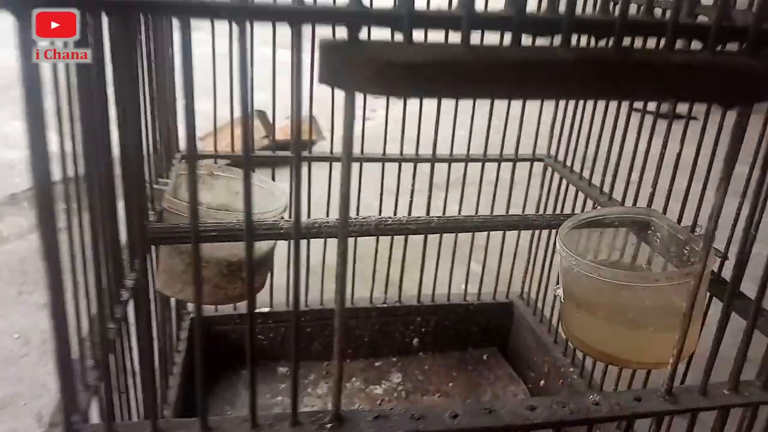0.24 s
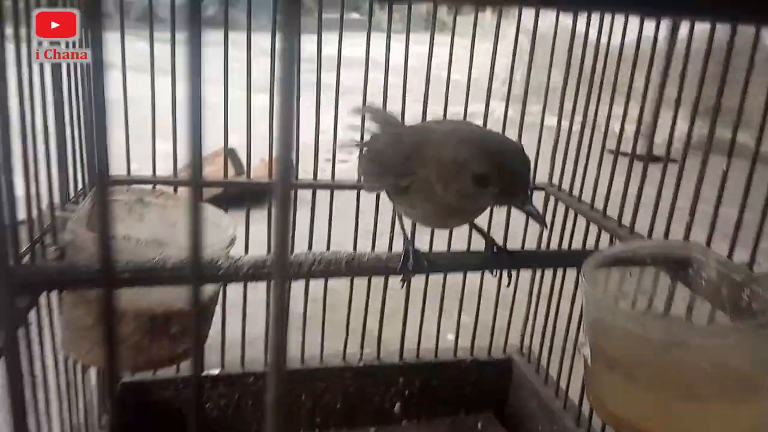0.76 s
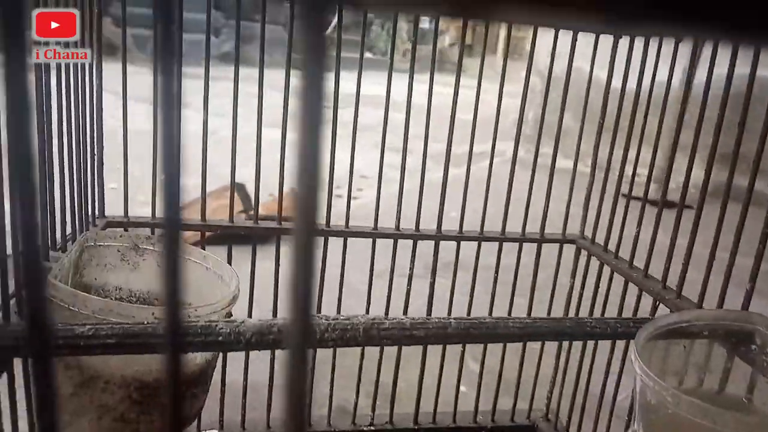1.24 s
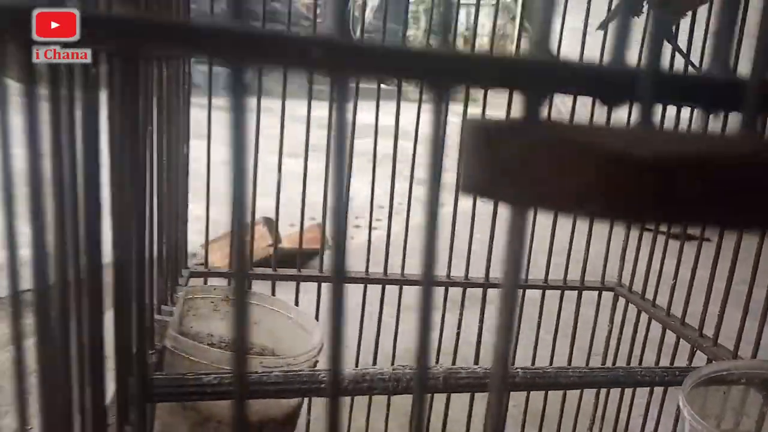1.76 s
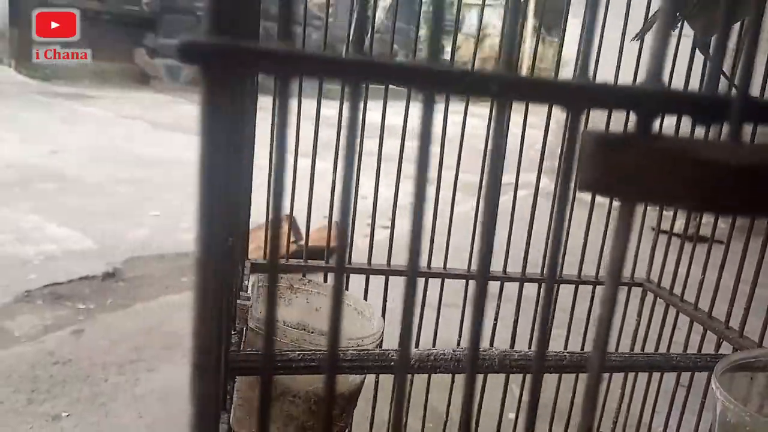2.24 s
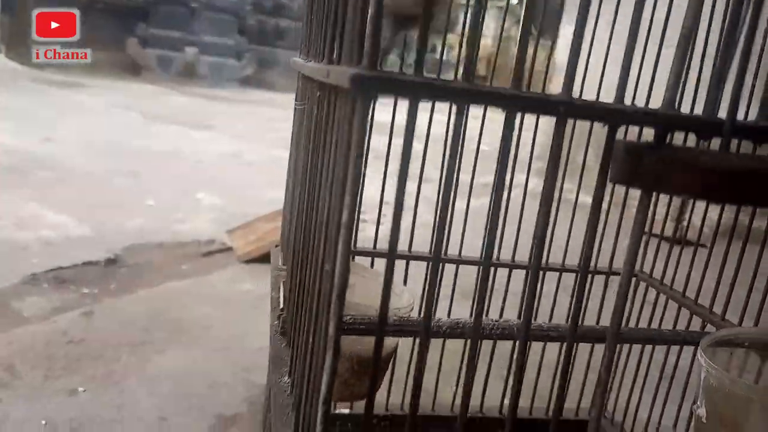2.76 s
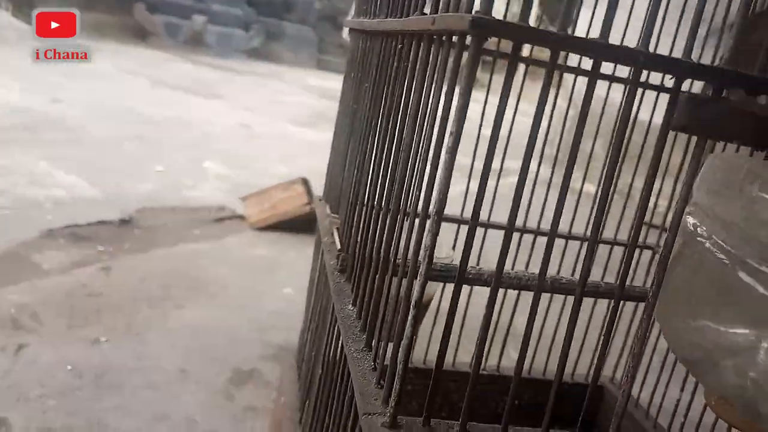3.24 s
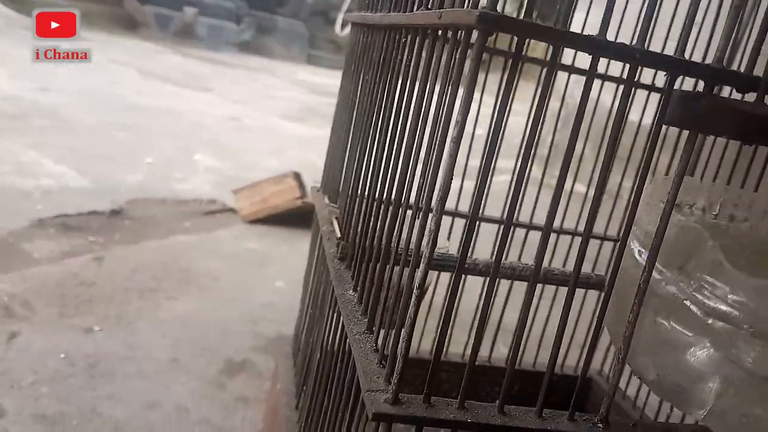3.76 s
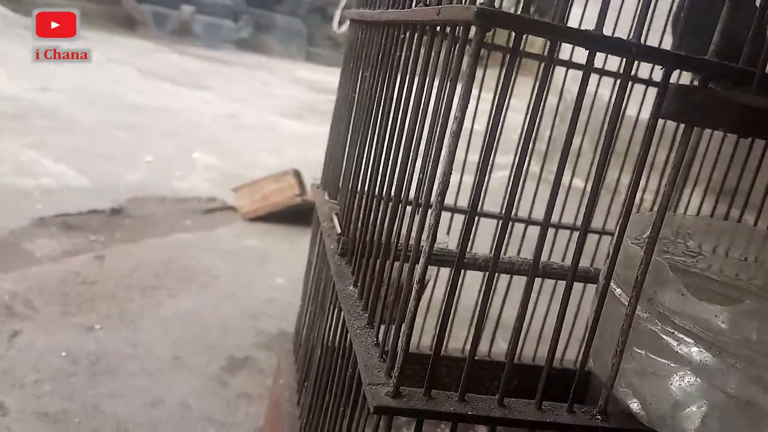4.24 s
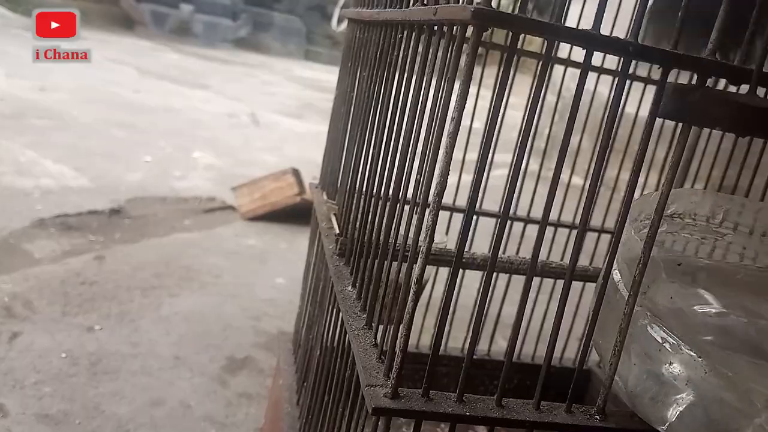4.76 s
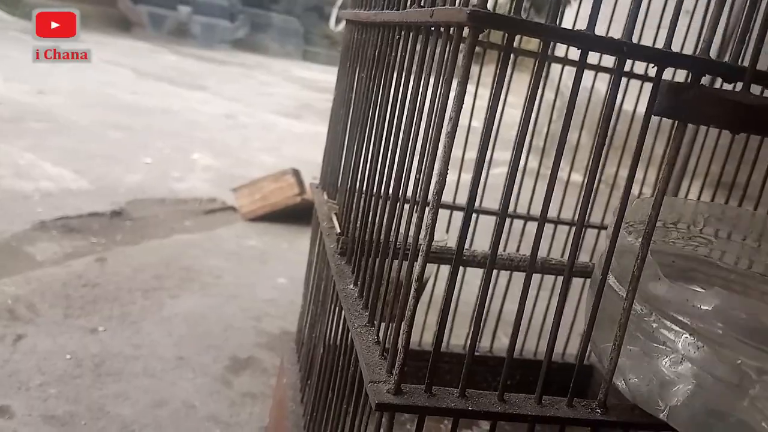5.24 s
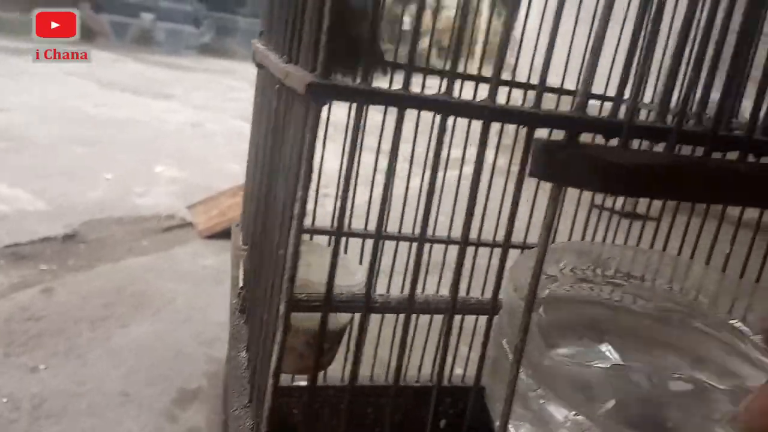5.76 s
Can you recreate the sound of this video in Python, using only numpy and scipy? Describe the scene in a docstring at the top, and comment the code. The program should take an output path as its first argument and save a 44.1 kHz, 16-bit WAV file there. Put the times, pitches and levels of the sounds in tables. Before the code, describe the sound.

Outdoors, a plastic tub is moved against a bird cage, giving scattered hollow knocks, ticks of the bars, short scrapes and a few dry snaps, busiest just past the middle. Over it all a cicada keeps up a hissing, rising buzz, each phrase opening with a clear whistle. Far birds chirp faintly, low bumps touch the hand-held microphone, and a fly hums softly past near the end.

```python
"""A cicada buzzes in a yard, near a bird cage: each phrase opens with a clear whistle and goes on as a
buzz that climbs in pitch, its overtones smeared by echoes in the trees. At the cage a hand moves
a plastic tub against the bars, so that both ring in knocks and the tub scrapes. The microphone is a
hand-held phone, rumbling with handling and puffs of air. A fly hums by; far off, birds chirp and coo
over the yard's low wash of noise, a faint hum and two thin insect-like bands."""
import sys
import numpy as np
from scipy import signal
from scipy.fft import rfft, irfft, next_fast_len
from scipy.io import wavfile
from scipy.ndimage import uniform_filter1d

SR = 44100
rng = np.random.default_rng(int(sys.argv[2]) if len(sys.argv) > 2 else 0)


def master(y):
    """Save y as 16-bit WAV."""
    cut = np.clip(np.atleast_2d(y).T, -1, 1)
    pcm = np.round(cut * 32767)  # scale
    wavfile.write(sys.argv[1], SR, pcm.astype(np.int16))


N = 264820


def undb(db):
    """dB to gain."""
    return 10 ** (np.asarray(db) / 20)


def unit(x):
    """Scale to rms 1."""
    return x / np.sqrt(np.mean(np.abs(x) ** 2))


def add(track, s, x):
    """Mix a short sound in at s seconds."""
    i = int(s * SR)
    track[i:i + len(x)] += x[:N - i]


def coloured(points):
    """Noise of rms 1 with a spectrum through (frequency [Hz], relative density [dB]) points."""
    hz, db = np.transpose(points)
    size = next_fast_len(N, True)
    bin_hz = np.arange(1, size // 2 + 2) * SR / size
    gain = undb(np.interp(np.log(bin_hz), np.log(hz), db, -99, -99))
    return unit(irfft(rfft(rng.standard_normal(size)) * gain, size)[:N])


def wobble(width_hz, order=2, step=8):
    """Complex noise wandering within a bandwidth; on a carrier it smears a line into a band."""
    lowpass = signal.butter(order, width_hz / 2, fs=SR / step, output="sos")
    lead, count = SR // (2 * step), N // step + 2
    white = rng.standard_normal(count + lead) + 1j * rng.standard_normal(count + lead)
    coarse = signal.sosfilt(lowpass, white)[lead:]
    return unit(np.interp(np.arange(N) / step, np.arange(count), coarse))


def carrier(hz):
    """Turning phasor at a moving frequency."""
    return np.sqrt(2) * np.exp(2j * np.pi * np.cumsum(hz) / SR)


def swells(table):
    """Sum of bell-shaped envelopes: (time [s], peak [dB], half-width to -20 dB [s])."""
    out = np.zeros(N)
    for s, db, half_width in table:
        offset = np.linspace(-2, 2, int(4 * SR * half_width))
        skip = max(int((2 * half_width - s) * SR) + 1, 0)
        add(out, s - 2 * half_width + skip / SR, undb(db - 20 * offset ** 2)[skip:])
    return out


def smear(x, length_s, decay_s):
    """Spread a sound in time over a tail of exponentially fading noise."""
    t = np.arange(int(length_s * SR)) / SR
    response = unit(rng.standard_normal(len(t)) * np.exp(-t / decay_s)) / np.sqrt(len(t))
    return signal.fftconvolve(x, response)[:N]


def drone(table, octave_db):
    """A wavering low tone with a weak octave, fading in at the time of its first row."""
    t = np.arange(N) / SR
    times, *columns = np.transpose(table)
    hz, db = [np.interp(t, times, column) for column in columns]
    tone = carrier(hz) * (1 + 0.75 * wobble(16))
    gate = uniform_filter1d(1. * (t > times[0]), SR // 20)
    return gate * undb(db) * (tone + undb(octave_db) * tone ** 2).real


def bird(notes, rough, rasp_hz, echo_db):
    """Short gliding notes, raspy, with the echo trail of a distant call."""
    out, rasp = np.zeros(N), 1 + rough * wobble(rasp_hz)
    for s, length, start_hz, end_hz, db in notes:
        count, i = int(length * SR), int(s * SR)
        glide = rasp[i:i + count] * carrier(np.linspace(start_hz, end_hz, count))
        add(out, s, undb(db) * np.sqrt(np.hanning(count)) * glide.real)
    return out + undb(echo_db) * smear(out, length_s=1 / 4, decay_s=0.097)


def yard_ambience(level_db=-66.5):
    """The bed of the place: a low, nearly steady wash of noise."""
    # spectrum of the yard: (frequency [Hz], relative density [dB])
    spectrum = [(15, -34), (25, 13), (48, -36), (139, 10), (363, 6.5), (500, 6), (919, 0.5), (1060, -13),
                (1150, -34), (1500, -19), (2530, -120)]
    return undb(level_db + 0.6 * wobble(9).real) * coloured(spectrum)


def faint_hum():
    """A low tone that sinks into the background after about a second."""
    # course of the hum: (time [s], pitch [Hz], level [dB])
    course = [(0, 299, -58), (.5, 292, -73), (1.1, 289, -70), (1.2, 290, -81)]
    return drone(course, octave_db=-38)


def far_insects():
    """Thin bands of steady pitch, likely farther insects, each swelling on its own."""
    # narrow bands: (centre [Hz], width [Hz], level [dB])
    bands = [(1294, 34, -48.5), (2267, 40, -58)]
    return sum(undb(db + 3.9 * wobble(5.5).real) * (wobble(width) * carrier(np.full(N, hz))).real
               for hz, width, db in bands)


def far_coos():
    """Faint held notes, perhaps doves a long way off."""
    # low calls: (time [s], length [s], start pitch [Hz], end pitch [Hz], level [dB])
    coos = [(1.74, 0.074, 496, 512, -65), (1.83, 0.15, 504, 522, -61.5), (2.76, 0.1, 950, 940, -62),
            (4.04, 0.32, 526, 486, -61), (4.24, 0.068, 733, 700, -60), (4.86, 0.081, 770, 780, -62),
            (5.16, 0.21, 499, 498, -64), (5.27, .08, 703, 690, -62), (5.55, 0.17, 603, 603, -57),
            (5.55, 0.25, 479, 491, -64)]
    return bird(coos, rough=1, rasp_hz=66, echo_db=-13)


def far_chirps():
    """A distant bird's high notes reach the microphone with plenty of echo."""
    # high calls: (time [s], length [s], start pitch [Hz], end pitch [Hz], level [dB])
    chirps = [(.61, 0.1, 5110, 5080, -30.5), (.64, .03, 4900, 4600, -30), (.858, 0.025, 5950, 6470, -27.5),
              (.875, 0.037, 6370, 6300, -26), (0.88, 0.025, 6000, 6070, -30), (.9, 0.034, 4900, 4780, -34),
              (.94, 0.076, 3710, 3320, -34.5), (1.065, 0.034, 5810, 5840, -25.5),
              (1.58, .06, 5200, 5000, -36), (1.623, 0.1, 3720, 3580, -30), (1.91, 0.074, 4980, 4760, -33),
              (1.976, 0.068, 3710, 3830, -34), (2.94, 0.022, 3830, 3700, -34)]
    return bird(chirps, rough=0.67, rasp_hz=150, echo_db=-3.5)


def fly():
    """Beating wings hum past the microphone near the end."""
    # the fly's pass: (time [s], wing beat [Hz], level [dB])
    flight = [(4.63, 232, -58), (4.76, 230, -49.5), (4.88, 239, -51), (5.155, 237.6, -48.5),
              (5.18, 235, -69), (5.36, 239, -55), (5.44, 238, -47), (5.88, 245, -51.5), (6.0, 246, -48)]
    return drone(flight, octave_db=-37)


def handling_rumble(floor_db=-70.5):
    """The hand and puffs of air bump the phone; a deep and an upper noise share each bump's power."""
    # bumps at the microphone: (time [s], peak [dB], half-width [s], deep share [0-1])
    bumps = [(0.052, -39.5, 0.03, 0), (0.12, -42, 0.069, .03), (0.596, -55, 0.042, 1),
             (0.969, -37.5, 0.084, .9), (1.17, -38.5, .065, 0.93), (2.788, -41.5, .08, 0.93),
             (3.062, -38, 0.053, 1), (3.195, -54, 0.1, .6), (3.32, -41.5, 0.1, 0.8), (3.5, -51, 0.087, 1),
             (3.793, -40.5, 0.085, 0.78), (3.917, -37.5, 0.043, 0.78), (4.18, -63, .08, .6),
             (4.51, -55, 0.067, 0), (4.757, -52, 0.083, 0.2), (5.03, -53, .12, 0.1),
             (5.174, -37.5, 0.057, .85), (5.43, -45, 0.046, 0.04), (5.53, -45.5, .07, .1),
             (5.8, -49.5, 0.19, 0.12)]
    # spectra of the deep and the upper part: (frequency [Hz], relative density [dB])
    deep_spectrum = [(22, -40), (36, -4), (50, -2.5), (70, 3), (90, -2), (130, -18)]
    upper_spectrum = [(60, -54), (90, -3), (130, 1.5), (190, -4.5), (270, -17.5), (450, -28)]
    s, db, half_width, share = np.transpose(bumps)
    share = np.clip(share, .01, .98)
    deep = swells(zip(s, db + 20 * np.log10(share), half_width)) + 0.42 * undb(floor_db)
    upper = swells(zip(s, db + 10 * np.log10(1 - share ** 2), half_width)) + undb(floor_db)
    return deep * coloured(deep_spectrum) + upper * coloured(upper_spectrum)


def tub_scrapes():
    """The tub drags along the bars: rough noise in soft-edged strokes."""
    # drags: (time [s], length [s], level [dB])
    drags = [(0.033, 0.15, -51), (1.122, 0.12, -47), (2.963, 0.1, -47), (3.148, 0.23, -38.5),
             (3.445, 0.15, -49), (3.735, 0.078, -47), (3.818, 0.2, -44.5), (5.64, 0.34, -55)]
    # spectrum of plastic rubbing on the bars: (frequency [Hz], relative density [dB])
    spectrum = [(400, -37), (500, -2), (800, 2), (1200, -8), (2000, 2.5), (3000, -4), (6000, -16),
                (9000, -11), (11000, -40)]
    strokes = np.zeros(N)
    for s, length, db in drags:
        add(strokes, s, undb(db) * np.sqrt(np.hanning(int(length * SR))))
    return strokes * undb(1.4 * wobble(49).real) * coloured(spectrum)


def strike(track, s, peak_db, modes, contact_s, low_cut_hz):
    """Mix in one contact: a soft, rough push sets damped modes ringing."""
    age = np.arange(SR // 8) / SR / contact_s
    low_cut = signal.butter(4, low_cut_hz, "high", fs=SR, output="sos")
    force = signal.sosfilt(low_cut, rng.standard_normal(len(age)) * age * np.exp(-age))
    ring = np.zeros(len(age))
    for hz, db, t60 in modes:
        pole = np.exp((2j * np.pi * hz - np.log(1000) / t60) / SR)
        ring += undb(db) * signal.lfilter([1], [1, -pole], force).imag
    add(track, s - .004, ring * undb(peak_db) / np.abs(signal.hilbert(ring)).max())


def cage_knocks(knock_s=0.0061, tick_s=0.0074, fall_db_per_octave=48):
    """Tub and bars ring together; where a knock lands favours the tub's modes near one pitch."""
    # tub against bars: (time [s], tub peak [dB], favoured pitch [Hz], bars peak [dB])
    knocks = [(.042, -39, 690, -42), (.074, -42, 800, -51), (.106, -41.5, 573, -42.5),
              (.515, -45, 900, -34), (.992, -47, 506, -40), (1.132, -40, 724, -23.5),
              (1.145, -35, 800, -24), (1.167, -39, 620, -56), (1.415, -28, 540, -40),
              (2.704, -45, 886, -38), (3.004, -40, 740, -33), (3.228, -38, 830, -43),
              (3.278, -35, 1080, -32), (3.31, -35, 690, -55), (3.39, -47, 618, -41),
              (3.499, -42, 644, -32.5), (3.765, -38, 613, -36), (3.872, -38, 955, -26.5),
              (3.915, -38, 1100, -47), (3.943, -35, 560, -32.5), (5.166, -46, 501, -45),
              (5.652, -60, 630, -32), (5.772, -35, 1040, -29), (5.799, -43, 1030, -49)]
    # contacts that ring the bars alone: (time [s], peak [dB])
    ticks = [(.492, -37), (1.086, -30), (2.945, -33), (3.169, -30), (3.461, -29), (3.697, -29.5),
             (3.848, -33), (4.855, -36), (5.273, -33), (5.69, -27), (5.719, -29), (5.749, -30)]
    # modes of the tub and of the bars: (frequency [Hz], relative gain [dB], t60 [s])
    tub_modes = [(517, -14, .035), (575, 12, 0.042), (632, 4.5, 0.097), (707, 6, 0.069), (800, 3, .035),
                 (873, 14, 0.073), (963, 11, 0.056), (1053, 13, 0.049)]
    bar_modes = [(1510, -42, .025), (1787, 46.5, 0.011), (1970, 57, 0.0094), (2240, 15, 0.075),
                 (2400, -23, .025), (3300, -32, .02)]
    out = np.zeros(N)

    def strike_bars(s, db, contact_s):
        """Each contact rings the bars' modes in a new balance."""
        modes = [(hz, gain + 3 * rng.standard_normal(), t60) for hz, gain, t60 in bar_modes]
        strike(out, s, db, modes, contact_s, low_cut_hz=1300)

    for s, tub_db, favoured_hz, bars_db in knocks:
        modes = [(hz, gain - fall_db_per_octave * abs(np.log2(hz / favoured_hz)), t60)
                 for hz, gain, t60 in tub_modes]
        strike(out, s, tub_db, modes, knock_s, low_cut_hz=440)
        strike_bars(s, bars_db, knock_s)
    for s, db in ticks:
        strike_bars(s, db, tick_s)
    return out


def dry_snaps():
    """Brief bursts of bright noise among the knocks."""
    # snaps: (time [s], peak [dB], length [s])
    snaps = [(1.136, -14, .006), (3.175, -19, .02), (5.7686, -6.5, .0013), (5.7704, -7, .0036)]
    out, t = np.zeros(N), np.arange(SR // 8) / SR
    band = signal.butter(3, [2100, 10500], "band", fs=SR, output="sos")
    for s, db, length in snaps:
        burst = signal.sosfilt(band, rng.standard_normal(len(t)) * np.exp(-(t / length) ** 3))
        add(out, s, undb(db) * burst / np.abs(burst).max())
    return out


def cicada_whistle(trail_db=-16.5, trail_s=.15, sharp_share=.012, settle_s=.1):
    """Runs of pips that start sharp and settle; each partial is a line plus its wavering echoes."""
    # partials of the whistle: (frequency [Hz], relative level [dB], roughness [0-1])
    partials = [(1287, -18, 0.85), (2575, 0.87, 0.57), (3590, -38, 0.3)]
    # pips: (time [s], peak [dB], half-width [s])
    pips = [(0.258, -32, 0.041), (0.355, -25, 0.049), (0.417, -27, 0.032), (0.489, -41, 0.018),
            (0.612, -32.5, 0.036), (0.81, -42, 0.079), (0.842, -34, 0.16), (0.898, -31, 0.0087),
            (0.987, -29, 0.011), (1.195, -29, 0.068), (1.274, -22, 0.017), (1.33, -37.5, 0.075),
            (1.485, -42, 0.15), (1.82, -32, 0.055), (1.88, -27.5, 0.034), (1.96, -33.3, 0.064),
            (2.101, -40, 0.093), (2.19, -38, 0.103), (2.401, -40.0, 0.14), (2.9, -32, 0.088),
            (2.947, -27.5, 0.012), (3.029, -23, 0.032), (3.106, -25.5, 0.059), (3.207, -34, 0.023),
            (3.346, -49, 0.128), (3.846, -39, 0.031), (3.914, -26.5, 0.038), (4.003, -20, 0.051),
            (4.095, -38.6, 0.091), (4.252, -33, 0.016), (4.807, -31.5, 0.075), (4.909, -25.9, 0.063),
            (5.035, -25.5, 0.049), (5.113, -27, 0.02), (5.177, -33, 0.02), (5.279, -37, 0.024),
            (5.729, -24, 0.063), (5.822, -21.5, 0.035), (5.957, -36.3, 0.02)]
    # start of each run of pips: (time [s])
    run_starts = [-.3, .22, .74, 1.14, 1.78, 2.08, 2.86, 3.83, 4.75, 5.65]
    direct = swells(pips)
    trail = signal.lfilter([20 / SR], [1, -np.exp(-1 / (trail_s * SR))], direct)  # fading echo
    out, t = np.zeros(N), np.arange(N) / SR
    age = t - np.array(run_starts)[np.searchsorted(run_starts, t) - 1]
    pitch = 1 + sharp_share * (np.exp(-age / settle_s) - .3) + 0.00199 * wobble(3.91).real
    for hz, db, rough in partials:
        waver = np.sqrt(1 - rough ** 2) + rough * wobble(48)
        out += undb(db) * (waver * carrier(hz * pitch)).real
    return (direct + undb(trail_db) * trail) * out


def buzz_pitch(middle_s=.45):
    """Pitch ratio of the buzz: it climbs through each phrase, passing 1 at the age middle_s."""
    # per phrase: start (time [s]) and climb (pitch rise [share per s])
    starts = [-.7, .2, 1.15, 2.06, 2.91, 3.92, 4.74, 5.63]
    climbs = [.06, .065, .065, .075, .05, .052, .045, .06]
    t = np.arange(N) / SR
    phrase = np.searchsorted(starts, t) - 1
    age = t - np.array(starts)[phrase]
    return uniform_filter1d(1 + np.array(climbs)[phrase] * (age - middle_s), SR // 16)


def buzz_levels(full_db=-25, treble_db=-6.5):
    """Buzz level and treble offset in dB: both sink as a phrase opens, then ease back."""
    # lulls: (weakest at [s], fall [s], recovery [s], depth [dB], further treble depth [dB])
    lulls = [(0.281, 0.19, 0.24, 4, 3.9), (1.34, 0.7, 0.18, 3, 2.3), (2.14, 0.51, 0.21, 3.5, 3.5),
             (2.99, 0.15, 0.16, 10.5, 6), (4.02, 0.24, 0.091, 10, 10), (4.96, 0.33, 0.22, 4, 4.5),
             (5.76, 0.21, 0.2, 4.5, 3.5)]
    weakest, fall, recovery, depth_db, treble_depth_db = np.transpose(lulls)
    t = np.arange(N) / SR
    since = t[::64, None] - weakest
    lull = np.where(since < 0, np.clip(1 + since / fall, 0, 1), np.exp(-np.abs(since) / recovery))
    return (full_db - np.interp(t, t[::64], lull @ depth_db),
            treble_db - np.interp(t, t[::64], lull @ treble_depth_db))


def cicada_buzz(throb_hz=112, hiss_db=-7.5, hiss_sway_db=2.2):
    """Overtones that echoes in the trees smear into bands; all climb together and throb lightly."""
    # bands of the buzz: (centre [Hz], width [Hz], relative level [dB], share of the swells [ratio])
    overtones = [(1339, 96, -23.5, 0.4), (1446, 132, -18, 0.43), (2791, 320, -7.5, 0.18),
                 (4174, 443, -4.5, 1.01), (5510, 524, -4, 1.01), (6740, 570, -9, 1), (8480, 1430, -9, 0.14),
                 (9626, 690, -5, 0.33), (10800, 780, -6, 0.4), (12160, 310, -14, 1.01),
                 (13900, 510, -19.5, 1.01), (15300, 660, -16, 1.01)]
    # hiss between the overtones: (frequency [Hz], relative density [dB])
    hiss_spectrum = [(1050, -29.5), (1250, -7.5), (1850, -16), (2300, -16), (3300, -5.5), (5000, -4.5),
                     (7000, 2.5), (8000, -20.5), (11500, -10.5), (16000, -20)]
    pitch = buzz_pitch()
    level_db, treble_db = buzz_levels()
    mean_db = level_db.mean()
    throb = 1 + 0.058 * (wobble(21) * carrier(np.full(N, throb_hz))).real
    out = undb(level_db + hiss_db + hiss_sway_db * wobble(4.3).real) * coloured(hiss_spectrum)
    for hz, width_hz, db, share in overtones:
        flicker_db = 1.2 * wobble(34).real
        gain_db = db + mean_db + share * (level_db - mean_db) + (hz > 8000) * treble_db + flicker_db
        band = wobble(width_hz, order=3 if hz < 2000 else 2) + 0.63 * wobble(width_hz / 2.25)
        out += undb(gain_db) * (band * carrier(hz * pitch)).real
    out *= throb
    # a short smear gives the buzz a fine, uneven, stranded texture
    return 0.84 * out + 0.33 * smear(out, length_s=1 / 8, decay_s=0.032)


def scene():
    """The whole yard reaches one microphone, the same in both channels."""
    background = yard_ambience() + faint_hum() + far_insects() + far_coos() + far_chirps()
    at_microphone = fly() + handling_rumble()
    at_cage = tub_scrapes() + cage_knocks() + dry_snaps()
    mono = background + at_microphone + at_cage + cicada_whistle() + cicada_buzz()
    return np.array([mono, mono])


def record(dry, top_hz=15750):
    """The recorder cuts the highest treble steeply."""
    return signal.sosfilt(signal.ellip(10, .2, 80, top_hz, fs=SR, output="sos"), dry)


dry = scene()
out = record(dry)
master(out)
```